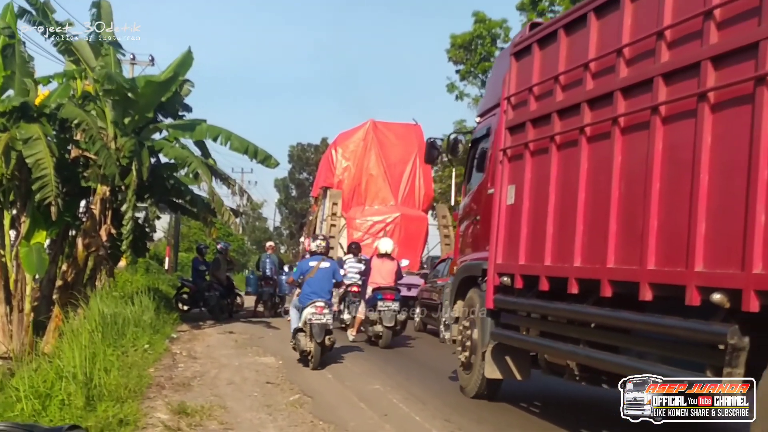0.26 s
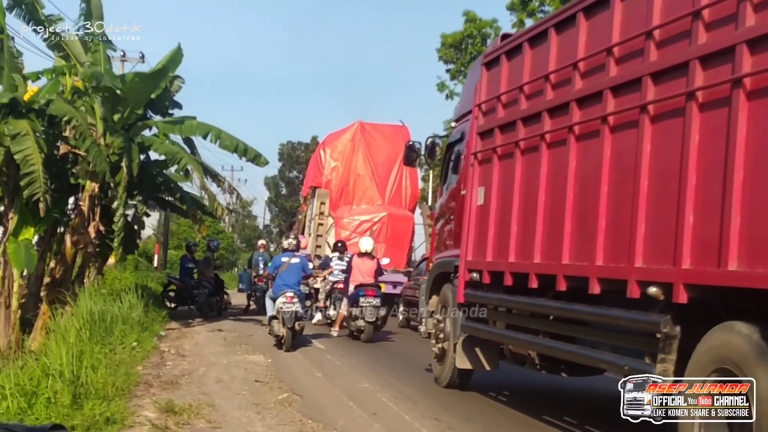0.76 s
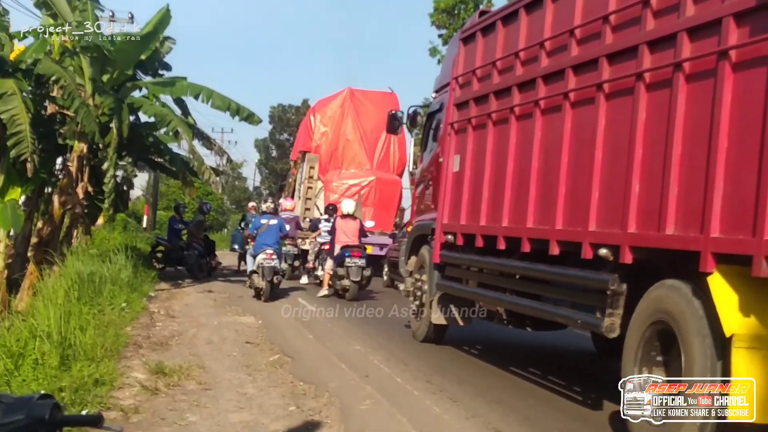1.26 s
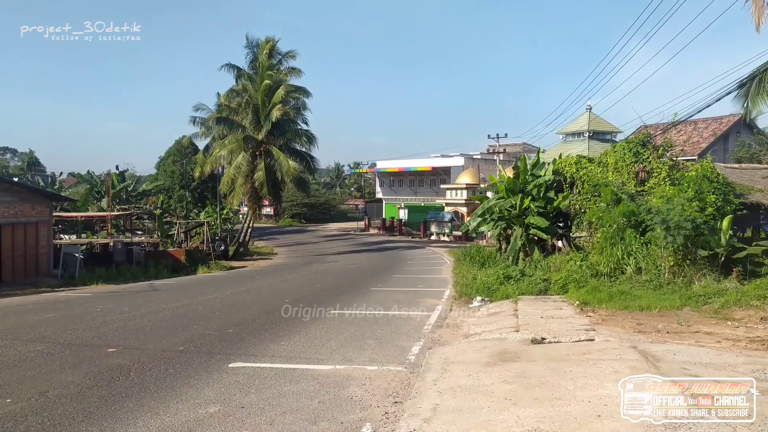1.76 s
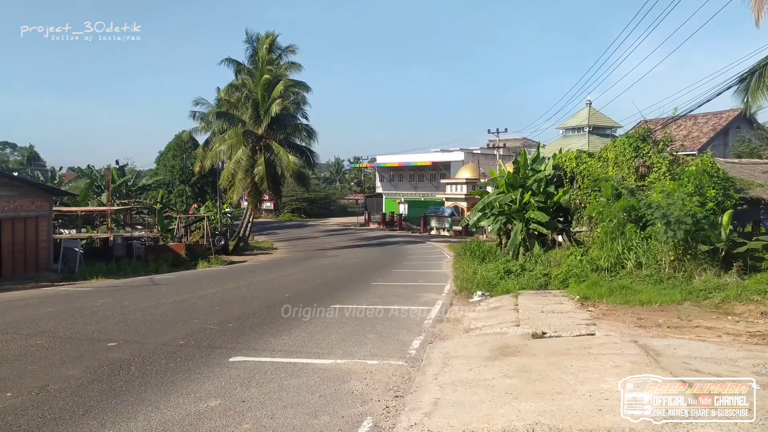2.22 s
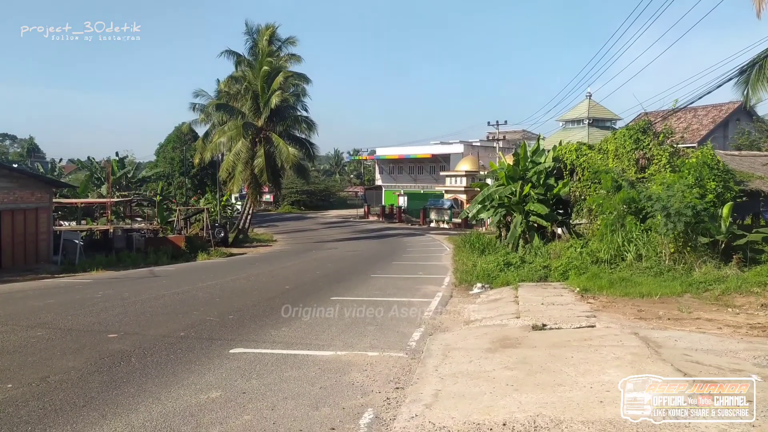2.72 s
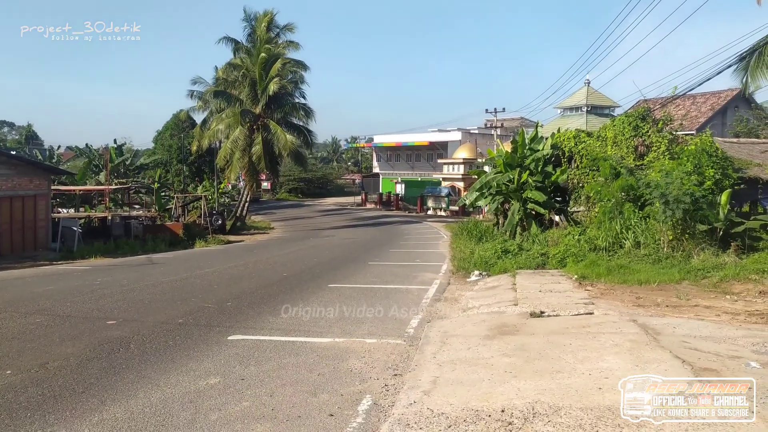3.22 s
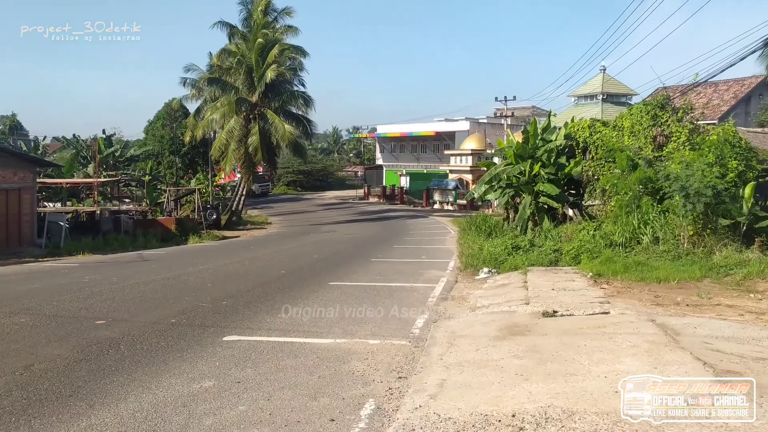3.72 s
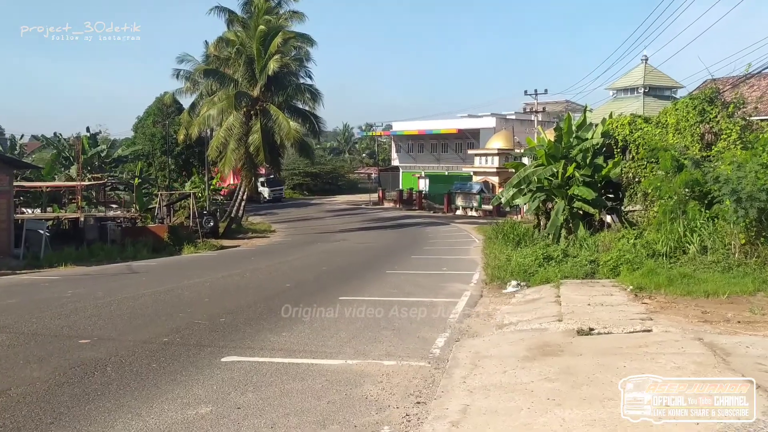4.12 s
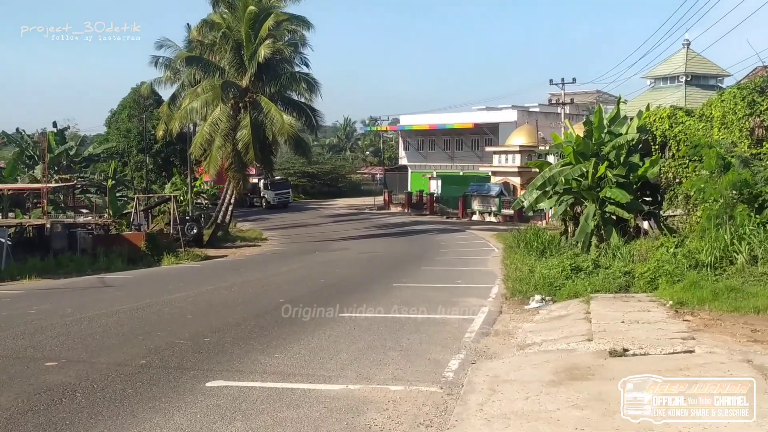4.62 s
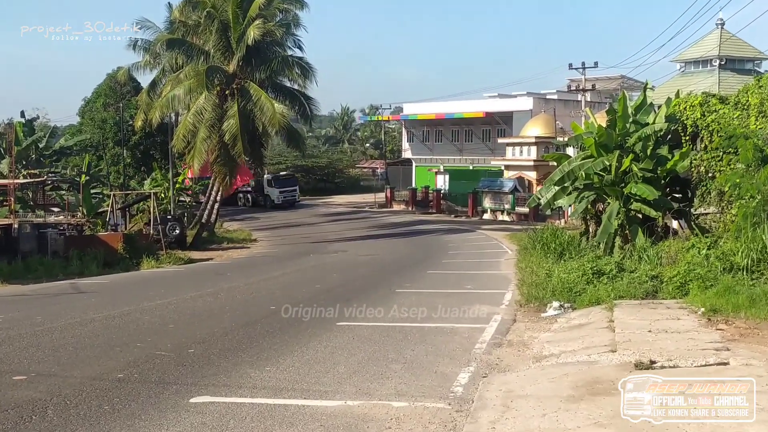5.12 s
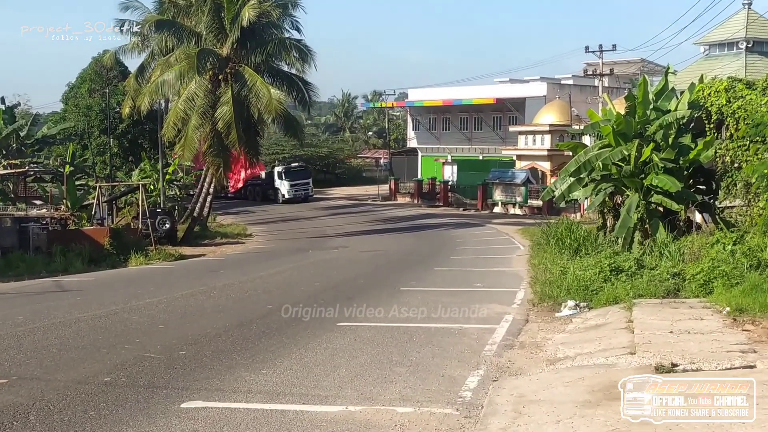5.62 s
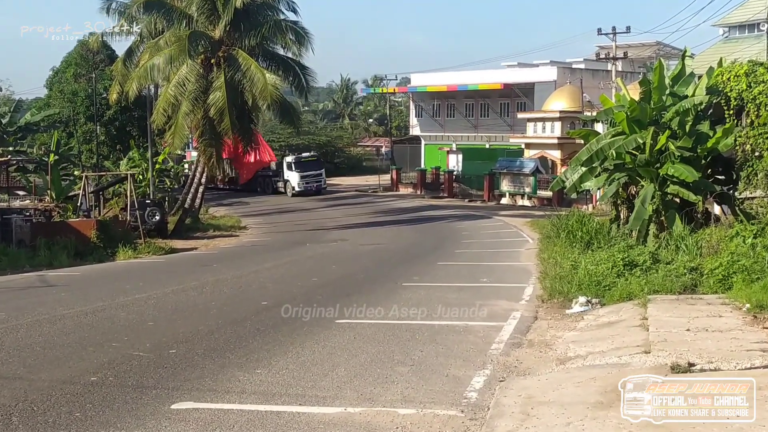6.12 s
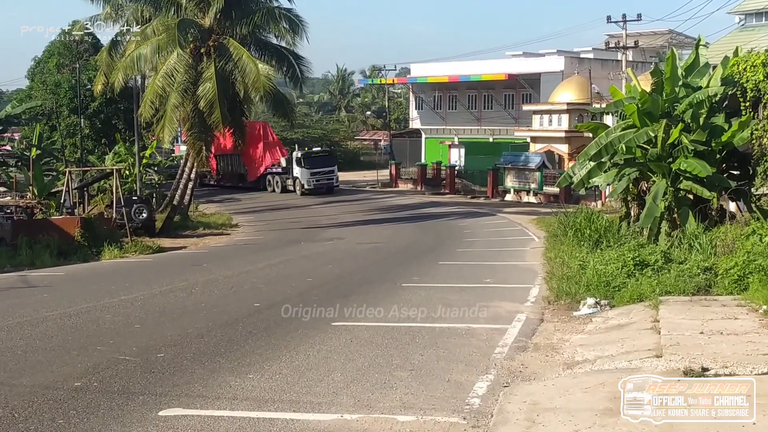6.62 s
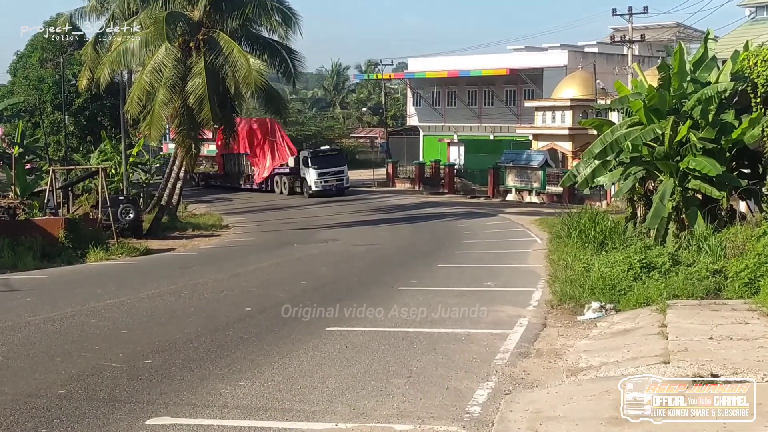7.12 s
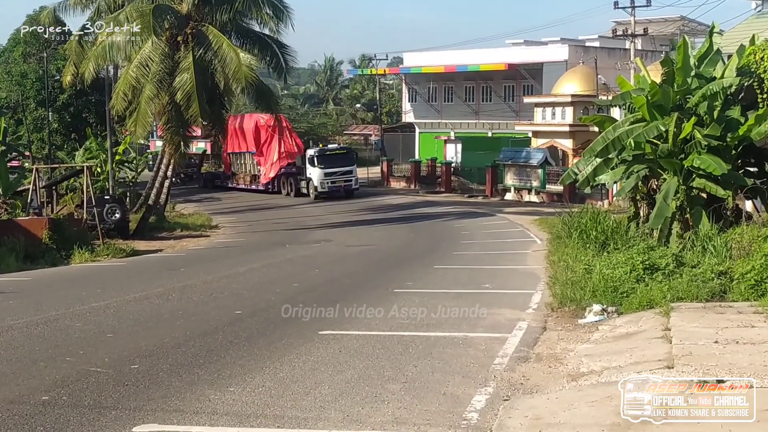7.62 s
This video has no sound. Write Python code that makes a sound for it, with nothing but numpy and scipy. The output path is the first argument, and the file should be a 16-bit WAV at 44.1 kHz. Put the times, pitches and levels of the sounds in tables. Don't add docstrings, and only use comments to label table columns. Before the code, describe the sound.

Outdoors, close to a roadside queue, two diesel trucks crawl with deep beating throbs, rattling metal, a motorcycle hum and tiny brake squeaks. The sound stops dead for a third of a second. Then a quieter open bend: a loaded truck climbs nearer with steady gear whine and swelling roar, an idling engine warbles, birds chirp and whistle, insects hiss, and a small latch clicks late.

```python
import sys
import numpy as np
from scipy import signal
from scipy.fft import rfft, irfft, next_fast_len
from scipy.io import wavfile
from scipy.ndimage import uniform_filter1d, map_coordinates

SR = 44100
rng = np.random.default_rng(int(sys.argv[2]) if len(sys.argv) > 2 else 0)


def transcribe(u):
    v = np.clip(np.atleast_2d(u).T, -1, 1)
    q = np.round(v * 32767).astype(np.int16)
    wavfile.write(sys.argv[1], SR, q)


def gain_from_db(level_db):
    decades = np.asarray(level_db, float) / 20
    return 10 ** decades


N = 346626
TIME = np.arange(N) / SR
NEAR_END_S, FAR_START_S = 1.427, 1.757

# [t/s, f/Hz]
NEAR_FIRING = [(0, 40.5), (.4, 39.9), (.7, 39.1), (1.0, 38.6), (1.43, 38.3)]
# [t/s, beat f/Hz]
BEAT = [(0, 9.15), (.45, 9.15), (.75, 6.94), (1.43, 6.94)]
# [t/s, f/Hz]
BIKE_FIRING = [(0, 22.18), (.7, 21.42), (1.43, 21.34)]
# [multiple, level/dB]
NEAR_ORDERS = [(1, -25.5), (2, -30), (3, -43), (4, -37.5), (5, -42.5), (6, -42.5), (7, -45.5)]
SECOND_ORDERS = [(1, -24.3), (1.5, -38.5), (2, -43), (3, -41)]
BIKE_ORDERS = [(1, -74), (4, -38.5), (5, -40), (8, -47)]
# [t/s, extra noise level/dB]
JOLTS = [
    (.088, 1),
    (.268, 1.2),
    (.58, 0.7),
]
# [f/Hz, level/dB per Hz]
NEAR_COLOUR = [(15, -23), (100, -5), (180, 2), (500, -8.5), (760, -16.5), (1560, -23), (2330, -18.5),
               (3330, -26), (5100, -23.5), (7200, -18.5), (9800, -23.5), (11800, -31.5), (14000, -35.5),
               (15700, -36)]
# [f/Hz, likeness 0..1]
NEAR_ALIKE = [(60, 1.0), (130, 1), (290, 0.92), (640, 0.71), (1410, 0.099), (3100, 0.34), (6820, 0.59),
              (15000, 0.01)]
# [f/Hz, left-right level/dB]
NEAR_SIDE = [(60, -2.5), (110, -2), (200, 0.5), (380, 0), (700, 0.5), (1290, 0), (2380, 6), (4400, 4),
             (8120, 1.5), (15000, -7)]
# [t/s, length/s, f/Hz, level/dB, left-right level/dB]
SQUEAKS = [(0.067, 0.11, 10050, -30, -5), (0.238, 0.036, 2300, -26, 4.5), (0.246, 0.063, 5570, -34.5, -5),
           (0.26, 0.049, 4700, -34, -2), (0.22, 0.057, 6930, -38.5, 12), (0.72, .02, 11100, -36.5, -13),
           (.51, 0.017, 9850, -28.5, -11), (0.565, 0.042, 3100, -33, -6.5), (0.564, 0.028, 5600, -34, 4.5),
           (0.557, 0.045, 9500, -35, -12), (.05, .08, 15300, -37.5, -2), (0.24, .08, 22000, -40, -3.5),
           (.72, .04, 15000, -49.5, -3), (.92, .08, 14500, -45.5, -2)]

# [f/Hz, level/dB per Hz]
FAR_COLOUR = [(18, -9.5), (60, -8.5), (200, 0.5), (420, -11), (640, -9.5), (900, -17), (1060, -14),
              (1280, -19.5), (2500, -21), (3400, -35.5), (5300, -38.5), (9600, -31), (11800, -39),
              (14100, -51), (14700, -90)]
# [f/Hz, likeness 0..1]
FAR_ALIKE = [(60, 0.85), (130, 1), (290, 0.96), (640, 0.83), (1410, 0.58), (3100, 0.96), (6820, 0.15),
             (15000, 0.32)]
# [f/Hz, left-right level/dB]
FAR_SIDE = [(60, 2), (110, -1), (200, 1), (380, 1.5), (700, 0), (1290, 1), (2380, 1), (4400, 11.5),
            (8120, -5.5), (15000, 11)]
# [t/s, second gear partial f/Hz, nearness level/dB, second partial level/dB, odd partials' gain level/dB]
CLIMB = [(1.77, 518.3, -9.0, -41, -13), (1.95, 518.2, -8.5, -50, -8.5), (2.2, 519, -9.5, -49, -12.5),
         (2.33, 521, -8.6, -38.5, -17), (3.3, 523.5, -6.5, -36, -10), (4.4, 527.3, -5, -30.5, -4),
         (5.2, 530.5, -1, -28, 1.5), (5.75, 533.3, 0, -33.5, 0), (6.4, 540.4, -0.2, -30, 0.5),
         (6.7, 541, 0.5, -28.5, -1.5), (7.25, 541.6, 0.8, -26.5, -2.5), (7.86, 546.4, 0.6, -30.5, -1.5)]
# [multiple, level/dB]
FIRE_ORDERS = [(1, -42), (2, -46.5)]
# [t/s, f/Hz]
IDLE = [(1.75, 9.7), (2.8, 9.6), (3.6, 9.48), (4.8, 9.42), (5.6, 9.35), (6.4, 9.52), (7, 9.35),
        (7.86, 9.25)]
# [multiple, level/dB]
IDLE_ORDERS = [(3, -57), (4, -51.5), (5, -45.5), (6, -46.5), (7, -48), (8, -47.5), (9, -45.5), (10, -47.5),
               (11, -57.5), (16, -51), (20, -57.5)]
# [t/s, f/Hz, level/dB]
ENGINE_WHISTLE = [(2.5, 4270, -60), (3.0, 4270, -54), (3.5, 4300, -48.5), (4.1, 4300, -46.5),
                  (5.1, 4335, -49.5), (5.2, 4380, -48), (6.5, 4370, -50), (7.2, 4375, -51),
                  (7.86, 4410, -51)]
# [t/s, length/s, from f/Hz, to f/Hz, level/dB]
WHISTLES = [
    (1.995, 0.23, 2380, 2215, -51),
    (2.459, 0.074, 2440, 2550, -45.5),
    (2.702, .058, 1960, 1950, -45),
    (2.827, 0.038, 2450, 2480, -46),
    (4.25, .034, 3780, 3820, -46),
    (5.08, .04, 2190, 2200, -53),
    (5.185, .05, 2260, 1770, -46),
]
# [t/s, length/s, from f/Hz, to f/Hz]
RISING = (4.36, .42, 2110, 2460)
# [t/s, length/s, from f/Hz, to f/Hz, level/dB]
CHIRPS = [(2.467, 0.033, 4700, 4205, -58), (2.475, 0.056, 7800, 5900, -49), (2.52, 0.054, 5900, 4440, -57),
          (3.538, 0.044, 5000, 3580, -53), (3.905, .044, 7120, 6300, -46), (4.21, .02, 6200, 6600, -45),
          (4.234, .05, 6600, 8200, -48), (4.284, 0.013, 7900, 4040, -39.5), (6.635, 0.014, 5000, 3780, -46),
          (6.892, .054, 7240, 6860, -48), (6.983, .014, 5000, 3570, -42.5), (7.129, .05, 7800, 6900, -44.5),
          (7.18, .015, 7170, 5450, -49), (7.235, .015, 8700, 6230, -50), (7.316, .04, 7500, 6830, -44)]
# [t/s, from f/Hz, level/dB]
CRIES = [
    (2.28, 4840, -46),
    (2.325, 4360, -50),
    (2.36, 3800, -54),
    (4.839, 4100, -47),
    (4.885, 3720, -50.5),
]
# [f/Hz, level/dB, time to fall 120 dB t/s]
LATCH = [(2790, .6, 0.072), (3350, -8, 0.04), (5050, -34, 0.071), (6270, -16, 0.046), (8100, -11, 0.037),
         (9910, 8, 0.032), (13870, -13, 0.09)]

# [f/Hz, level/dB]
FAINT_LIMIT = [(2500, -20), (3300, -5), (4300, -4), (5400, 1), (7000, -1), (8500, -9), (10000, -8),
               (11200, 7), (12800, 2), (14200, 4), (15200, 14)]


def in_time(rows):
    s, *columns = np.transpose(rows)
    return [np.interp(TIME, s, c) for c in columns]


def drift(rate):
    coarse = TIME[::64]
    wander = map_coordinates(rng.standard_normal(1200), [coarse * rate], order=3)
    return np.interp(TIME, coarse, wander)


def place(x, pan_db, lag):
    at = np.arange(len(x))
    left = np.interp(at - lag, at, x) * gain_from_db(pan_db / 2)
    return np.array([left, x * gain_from_db(-pan_db / 2)])


def orders(turns, table, flutter_db, spread=1):
    total = 0
    for k, db in table:
        strength = np.sqrt(2) * gain_from_db(db + flutter_db * drift(9))
        total = total + strength * np.cos(2 * np.pi * (k * turns + spread * rng.random()))
    return total


def traffic(colour, alike, side, levels_db, splits_hz, patchy_db, lag):
    size = next_fast_len(N)
    octave = np.log2(np.maximum(np.arange(size // 2 + 1) * SR / size, 1))

    def read(points):
        hz, value = np.transpose(points)
        return np.interp(octave, np.log2(hz), value)

    like, sign = np.clip(read(alike), 0, .999), np.array([[1], [-1]])
    mid, apart = rfft(rng.standard_normal((2, size)))
    waves = np.sqrt(1 + like) * mid + sign * np.sqrt(1 - like) * apart
    waves = waves * gain_from_db(read(colour) + sign * read(side) / 2)
    waves[0] *= np.exp(-2j * np.pi * 2 ** octave * lag / SR)
    groups, together = np.zeros((3, 2, N)), drift(6)
    for centre in np.arange(4, 15):
        band = irfft(waves * np.clip(1 - abs(octave - centre), 0, 1), size)[:, :N]
        flicker = gain_from_db(patchy_db * (0.32 * together + drift(14)))
        groups[np.searchsorted(splits_hz, 2. ** centre)] += band * flicker
    return sum(gain_from_db(db) * g / g.std() for db, g in zip(levels_db, groups))


def add(out, start, length, hz_from, hz_to, db, pan_db, rough, waver_hz=0):
    part = np.linspace(0, 1, int(length * SR))
    tremble, waver = (np.interp(part * length * rate, np.arange(300), rng.standard_normal(300))
                      for rate in (600, 150))
    hz = hz_from + (hz_to - hz_from) * part + waver_hz * waver
    strength = np.sqrt(2) * gain_from_db(db) * np.sin(np.pi * part) ** 0.3 * (1 + rough * tremble)
    note = strength * np.sin(2 * np.pi * np.cumsum(hz) / SR)
    at = int(start * SR)
    out[:, at:at + len(part)] += place(note, pan_db, 2.54)


def queue():
    cancel_s, jolt_s = .09, .04
    near = np.cumsum(in_time(NEAR_FIRING)[0]) / SR
    beats = np.cumsum(in_time(BEAT)[0]) / SR
    second = near + beats - beats[int(cancel_s * SR)] + .5
    tones = 0
    for turns, table in ((near, NEAR_ORDERS), (second, SECOND_ORDERS)):
        tones = tones + np.sqrt(2) * gain_from_db(table[0][1] + drift(4.9)) * np.sin(2 * np.pi * turns)
    tones += orders(near, NEAR_ORDERS[1:], 1.6) + orders(second, SECOND_ORDERS[1:], 3.8)
    tones += orders(np.cumsum(in_time(BIKE_FIRING)[0]) / SR, BIKE_ORDERS, 2.5)

    away_db = -1.5 * np.minimum(TIME, NEAR_END_S)
    jolt_db = sum(db * np.exp(-((TIME - s) / jolt_s) ** 2) for s, db in JOLTS)
    rumble_db = -27.5 + 0.78 * away_db + jolt_db
    clatter_db = -27.0 + 0.8 * away_db + jolt_db
    hiss_db = -26 + 2.1 * away_db + jolt_db
    knock_db = 1.6 * np.exp(-3.0 * (near % 1)) + 2.2 * np.exp(-3.0 * (second % 1))
    levels_db = rumble_db, clatter_db + knock_db, hiss_db + 0.5 * knock_db
    noise = traffic(NEAR_COLOUR, NEAR_ALIKE, NEAR_SIDE, levels_db, [700, 3500], patchy_db=1.2, lag=-3.0)
    return tones + noise


def squeaks():
    out = np.zeros((2, N))
    for s, length, hz, db, pan_db in SQUEAKS:
        add(out, s, length, hz, hz, db, pan_db, rough=1.0, waver_hz=60)
    return out


def road():
    near_db = in_time(CLIMB)[1]
    rumble_db = -34.5 + 0.3 * near_db
    roar_db = -31 + 0.9 * near_db
    insect_db = -39.5 - 6 * np.exp(-np.maximum(TIME - FAR_START_S, 0) / 1.54)
    levels_db = rumble_db, roar_db, insect_db
    return traffic(FAR_COLOUR, FAR_ALIKE, FAR_SIDE, levels_db, [400, 3500], patchy_db=1.0, lag=4.47)


def climbing_truck():
    firings_per_turn = .2757
    twice_hz, _, main_db, odd_db = in_time(CLIMB)
    turns = np.cumsum(twice_hz / 2 * (1 + .0015 * drift(12))) / SR
    whine = orders(turns, [(2, main_db)], 1.03)
    whine += orders(turns, [(1, -34.1 + odd_db), (3, -40 + odd_db)], 2.3)
    # multiple, s, dB, fade
    for k, s, db, fade_db in ((3, 2.0, -41, 300.0), (4, 5.7, -44, 40.0)):
        whine += gain_from_db(db - fade_db * (TIME - s) ** 2) * np.sin(2 * np.pi * k * turns)
    firing = orders(firings_per_turn * np.cumsum(twice_hz / 2) / SR, FIRE_ORDERS, 2.8)
    return place(whine, -0.92, 2.5) + firing


def idling_engine():
    throb_s = 2.812
    turns = np.cumsum(in_time(IDLE)[0]) / SR
    turns -= turns[int(throb_s * SR)]
    hz, db = in_time(ENGINE_WHISTLE)
    firing = np.cos(2 * np.pi * 3 * turns)
    hz = hz + (85 - 5 * TIME) * firing + 18 * drift(40)
    strength = np.sqrt(2) * gain_from_db(db + 2.0 * firing + 1.5 * drift(60))
    whistle = strength * np.sin(2 * np.pi * np.cumsum(hz) / SR)
    fade_in = np.clip((TIME - 2.3) / 0.73, 0, 1) ** 2
    return orders(turns, IDLE_ORDERS, 2.0, spread=.12) + place(fade_in * whistle, 7.5, 2.6)


def cicada():
    since = TIME - FAR_START_S
    hz = 10420 - 130 * since + 90 * drift(200)
    level_db = -49 - 6 * since + 5 * drift(45)
    return gain_from_db(level_db) * np.sin(2 * np.pi * np.cumsum(hz) / SR)


def flock(notes, rough, echo_db, t60, waver_hz=0):
    calls = np.zeros((2, N))
    for note in notes:
        add(calls, *note, rough=rough, waver_hz=waver_hz)
    echoes = rng.standard_normal((2, 12000)) * gain_from_db(-60 * TIME[:12000] / t60)
    return calls + gain_from_db(echo_db) * signal.oaconvolve(calls, echoes, axes=1)[:, :N]


def birds():
    whistle_pan_db, chirp_pan_db, cry_pan_db = 10.5, 6.5, 6.4
    cry_s, cry_fall = .048, .55
    start, length = RISING[:2]
    rising = flock([(*RISING, -38.5, whistle_pan_db)], rough=.12, echo_db=-42, t60=.15)
    rising *= gain_from_db(17.0 * np.clip((TIME - start) / length - 1, -1, 0))
    chirps = flock([(*row, chirp_pan_db) for row in CHIRPS], rough=.7, echo_db=-31.5, t60=0.32, waver_hz=130.)
    whistles = flock([(*row, whistle_pan_db) for row in WHISTLES],
                     rough=.6, echo_db=-31, t60=0.3, waver_hz=110)
    cry_notes = [(s, cry_s, hz, cry_fall * hz, db, cry_pan_db) for s, hz, db in CRIES]
    cries = flock(cry_notes, rough=.6, echo_db=-24.5, t60=0.55, waver_hz=100.)
    return chirps + rising + whistles + cries


def latch():
    since = TIME[:5000]
    push = (since < .005) + 0.36 * (abs(since - .0185) < .001)
    out, at = np.zeros((2, N)), int(5.8655 * SR)
    for hz, db, t60 in LATCH:
        decay = gain_from_db(-60 / (.5 * t60 * SR))
        swell = signal.lfilter([1 / 150], [1, -decay], push)
        rattle = 1 + 0.3 * np.interp(since * 3000, np.arange(400), rng.standard_normal(400))
        ring = gain_from_db(db - 14) * swell * rattle * np.sin(2 * np.pi * hz * since)
        out[:, at:at + 5000] += place(ring, 2.1, 1.65)
    crack = np.diff(rng.standard_normal((2, 5001)))
    crack *= np.clip(since / 0.0022, 0, 1) * gain_from_db(-60 * since / 0.057)
    out[:, at:at + 5000] += gain_from_db(-23) * crack
    return out


def scene():
    first = np.clip((NEAR_END_S - TIME) / 0.0013, 0, 1)
    second = np.clip((TIME - FAR_START_S) / 0.0041, 0, 1)
    bend = road() + climbing_truck() + idling_engine() + cicada() + birds() + latch()
    return first * (queue() + squeaks()) + second * bend


def drop_faint(x):
    hz, _, cells = signal.stft(x, SR, "cosine", nperseg=1536, noverlap=768)
    power = abs(cells) ** 2
    level = uniform_filter1d(np.log(power + 1e-20), size=36, axis=1)
    level = uniform_filter1d(level, size=3, axis=2)
    local = 2.1 * np.exp(level)
    wander = rng.standard_normal((len(hz) // 8 + 1, cells.shape[2] // 2 + 1))
    wander = wander.repeat(8, axis=0).repeat(2, axis=1)[:len(hz), :cells.shape[2]]
    limit_db = np.interp(hz, *np.transpose(FAINT_LIMIT), left=-60)[:, None] + 5 * wander
    kept = cells * (power > local * gain_from_db(2 * limit_db))
    return signal.istft(kept, SR, "cosine", nperseg=1536, noverlap=768)[1][:, :N]


def band_limit(x):
    return signal.sosfilt(signal.butter(12, 15710, fs=SR, output="sos"), x)


def record(dry):
    mix = drop_faint(dry)
    return band_limit(mix)


dry = scene()
out = record(dry)
transcribe(out)
```